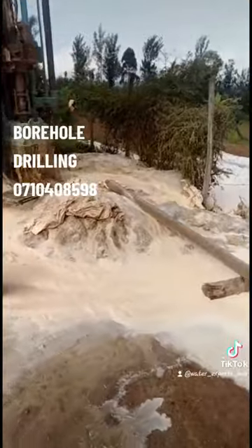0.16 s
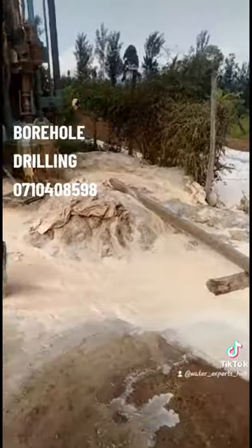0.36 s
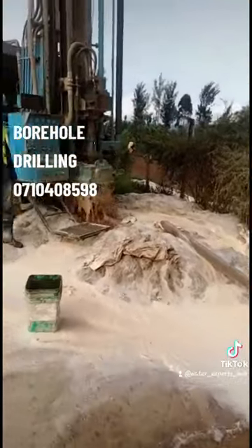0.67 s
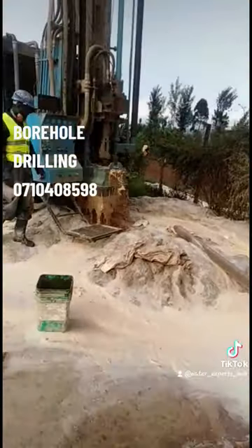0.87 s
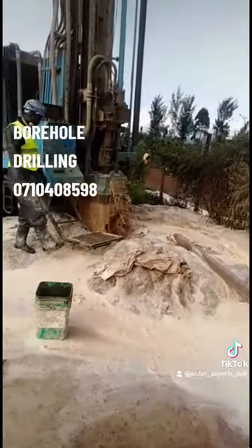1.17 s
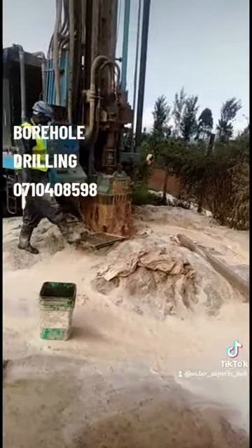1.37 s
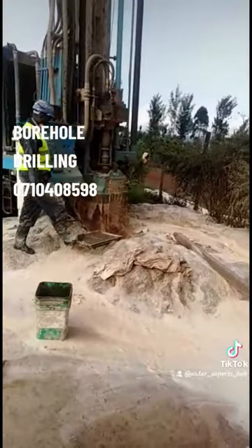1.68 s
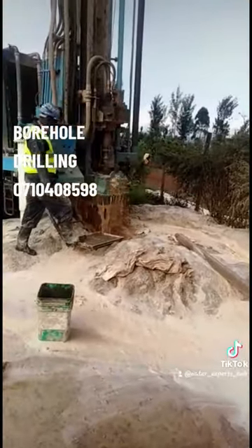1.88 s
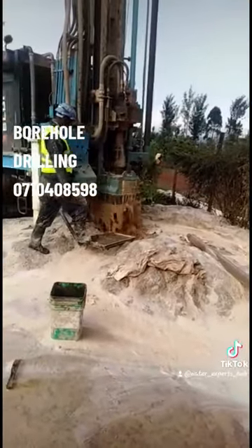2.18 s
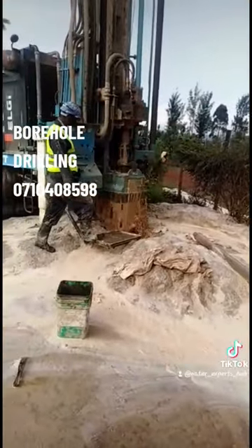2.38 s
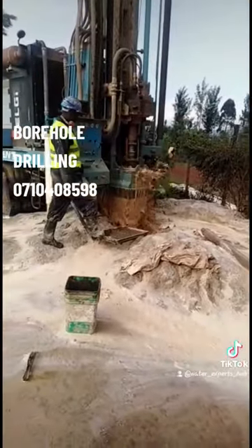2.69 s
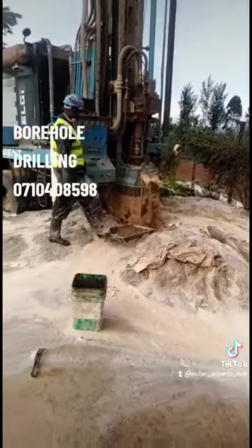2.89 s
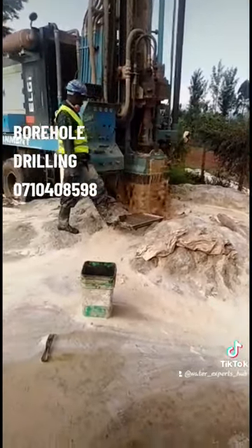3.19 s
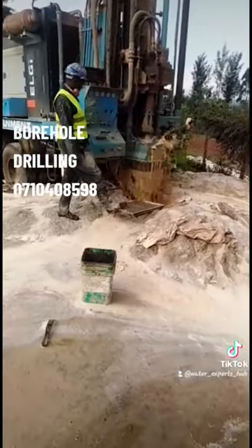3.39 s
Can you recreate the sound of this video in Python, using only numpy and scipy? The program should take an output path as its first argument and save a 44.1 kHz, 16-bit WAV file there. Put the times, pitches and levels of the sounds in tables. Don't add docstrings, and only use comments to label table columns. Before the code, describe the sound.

Deep throbbing diesel drone of a drilling rig, with hissing air, wet splatter and metal knocks

```python
import sys
import numpy as np
from scipy import signal
from scipy.fft import rfft, irfft
from scipy.io import wavfile
from scipy.ndimage import uniform_filter1d

SR = 44100
rng = np.random.default_rng(int(sys.argv[2]) if len(sys.argv) > 2 else 0)


def undo_db(level):
    steps = np.asarray(level, float) / 20
    return 10 ** steps


def file_out(sig):
    cols = np.atleast_2d(sig).T
    lim = np.clip(cols, -1, 1)
    pcm = np.round(lim * 32767).astype(np.int16)
    wavfile.write(sys.argv[1], SR, pcm)


N = 156114

# (time [s], firing rate [Hz], level [dB])
ENGINE_RUN = [(0, 68.92, -12.5), (.2, 67.91, -17.5), (.5, 67.52, -15.5), (1.1, 66.39, -16.5),
              (1.55, 66.32, -16.5), (1.85, 67.88, -15.5), (2.1, 69.7, -16.5), (2.27, 71.3, -14.5),
              (2.4, 72.78, -16), (2.55, 74.24, -13), (2.72, 75.16, -13), (2.85, 75.24, -15.5),
              (2.95, 74.87, -13), (3.15, 74.85, -13.5), (3.35, 72.58, -19.5), (3.44, 71.7, -17.5),
              (3.5, 71.3, -17)]
# (multiple of shaft rate, level [dB])
SHAFT_ORDERS = [(.5, -31), (1, -26.5), (1.5, -30), (2, -25), (2.5, -27), (3, -0.5), (3.5, -21.5), (4, -17),
                (4.5, -22), (5, -26), (6, -21), (7, -35), (7.5, -27.5), (9, -15), (12, -28), (13, -45),
                (14, -36.5), (15, -36.5), (16, -33.5), (17, -37.5)]
# (frequency [Hz], density [dB per Hz])
ROAR_COLOUR = [(15, -23), (50, -1), (90, 3), (200, -8.5), (400, -10), (800, -20), (1500, -32), (4000, -58)]
# (time [s], flow level [dB], left lean [dB])
AIR_FLOW = [(0, 6, -1.5), (.45, -0.5, 10.5), (.5, 3, 4), (.92, 2.5, 6.5), (1.4, 2.5, 1.5),
            (1.95, -1.5, 4.5), (2.25, -1, 6.5), (2.55, 1.5, 5), (2.7, -2.5, 4), (2.9, -5, 0),
            (3.02, 1, 6.5), (3.2, -4.5, 1), (3.3, -0.5, -6), (3.54, 1, 2.5)]
# (frequency [Hz], density [dB per Hz])
BLAST_COLOUR = [(300, -14), (1000, -17), (2200, -4), (2700, 0), (3800, -3.5), (4300, -5.5), (8000, -11.5),
                (14500, -21.5)]
# (frequency [Hz], width [Hz], level [dB])
CASING_MODES = [(1120, 52, 16.5), (1490, 15.3, 11.5), (1703, 130, -0.5), (2165, 170, -11), (2610, 19, -2),
                (3220, 360, -11), (3550, 88, -5), (3935, 130, -12.5), (4930, 92, -5)]
# (peak time [s], length [s], spray level [dB], splosh level [dB])
SLURRY_GUSHES = [(0.125, 0.012, -38.5, -53), (0.181, 0.057, -46, -63), (0.26, 0.014, -68, -65),
                 (0.331, 0.21, -42.5, -40), (0.592, 0.046, -44.5, -36), (0.655, 0.018, -47.5, -38),
                 (0.826, 0.1, -46, -34.5), (0.993, 0.069, -44.5, -33), (1.095, 0.069, -40.5, -40),
                 (1.213, 0.08, -42.5, -39.5), (1.35, 0.14, -44.5, -42), (1.497, 0.11, -49.5, -33),
                 (1.656, 0.092, -43.5, -37.5), (1.746, 0.016, -48, -34), (1.89, 0.2, -46.5, -39.5),
                 (2.134, 0.05, -44, -30.5), (2.196, 0.04, -46, -36.5), (2.323, 0.034, -43.5, -31.5),
                 (2.446, 0.084, -52.5, -36.5), (2.589, 0.061, -61, -42), (2.709, 0.022, -72, -54),
                 (2.767, 0.061, -57, -39.5), (2.842, 0.052, -52.5, -40), (3.089, 0.11, -47.5, -39.5),
                 (3.258, 0.019, -54, -42), (3.312, 0.046, -58, -50), (3.455, 0.026, -55, -55)]
# (frequency [Hz], density [dB per Hz])
SPRAY_COLOUR = [(1200, -11.5), (2000, -6.5), (3000, 3.5), (4000, -0.5), (6000, -5.5), (8000, -7),
                (10000, -11.5), (14500, -16)]
# (frequency [Hz], density [dB per Hz])
SPLOSH_COLOUR = [(120, -31), (250, -12), (450, 3), (700, 3.5), (900, -3), (1300, -7), (2000, -10.5),
                 (3000, -42)]
# (peak time [s], length [s], level [dB])
AIR_SQUIRT = [
    (3.075, 0.043, -46),
]
# (frequency [Hz], density [dB per Hz])
SQUIRT_COLOUR = [(5000, -32), (6500, -12), (7300, 0), (8300, -10), (10500, -29)]
# (time [s], level [dB])
GUARD_TICKS = [(0.183, -29), (0.3154, -18), (0.5511, -29), (0.5811, -27), (0.7667, -32), (0.8809, -32),
               (1.1827, -34), (1.3189, -22.5), (1.5733, -28), (2.0742, -29), (2.0916, -31), (2.3156, -32),
               (2.414, -32), (2.574, -37), (2.9627, -46), (3.2266, -35), (3.2924, -40), (3.3074, -39),
               (3.4466, -31)]
# (time [s], level [dB], pitch [Hz])
PIPE_CLANKS = [(.312, -26, 675), (.33, -58, 2600), (.44, -45, 2650), (.65, -28.5, 1110), (0.789, -41, 1800),
               (0.963, -29, 1120), (1.19, -36, 1120), (1.484, -34, 920), (2.308, -44, 1490),
               (2.446, -32.5, 1660), (3.037, -34.5, 1240), (.6, -28.5, 650), (.875, -35, 1120),
               (.815, -36, 1790), (.46, -37, 2470), (2.78, -39, 1070)]
# (pitch ratio, level [dB], t60 [s])
PIPE_MODES = [(1.002, 1, .055), (1.04, -2.5, .045), (1.325, -6, .04), (1.57, -8, .035)]
# (time [s], level [dB], pitch [Hz])
STRING_KNOCKS = [(0.117, -17, 452), (0.133, -13, 460), (0.19, -26, 465), (0.246, -30, 476),
                 (0.297, -13, 546), (0.313, -19, 560), (0.534, -13, 614), (0.567, -13, 445),
                 (0.651, -36, 487), (0.71, -11.5, 617), (0.773, -22, 640), (0.846, -15.5, 576),
                 (0.937, -10, 520), (0.968, -17, 527), (0.985, -52, 482), (1.033, -28, 560),
                 (1.254, -17, 570), (1.321, -41, 503), (1.369, -39, 574), (1.415, -24, 506),
                 (1.467, -35, 493), (1.495, -25.5, 567), (1.528, -33, 576), (1.64, -27, 455),
                 (1.733, -21, 473), (2.111, -30, 464), (2.301, -26, 544), (2.596, -32, 580),
                 (2.767, -26, 474), (3.036, -27, 700)]
# (pitch ratio, level [dB], t60 [s])
STRING_MODES = [(1.0, -9, .035), (1.21, -10, .03), (.62, -10, .04), (1.5, -13, .025)]
# (time [s], level [dB], pitch [Hz])
SLUG_THUMPS = [(2.295, -28, 140), (2.305, -30.5, 225), (2.365, -23.5, 142), (2.425, -26.5, 149),
               (2.43, -30, 326), (2.505, -26, 160), (2.8, -26, 162), (2.87, -25.5, 159), (2.92, -23, 152),
               (2.955, -25, 176), (3.01, -25, 154), (3.125, -23.5, 173.6), (3.23, -26.5, 147),
               (3.41, -21.5, 153), (.36, -17, 165)]
# (pitch ratio, level [dB], t60 [s])
SLUG_MODES = [(1.0, 2.5, 0.21), (1.2, -9.5, .12)]
# (frequency [Hz], left-right coherence)
PORT_LIKENESS = [(60, 0.99), (150, 0.86), (300, 0.87), (600, 0.77), (1200, 0.29), (2500, 0.27), (5000, 0.5),
                 (10000, 0.15)]
# (frequency [Hz], left minus right [dB])
PORT_LEAN = [(60, 3.5), (180, 4.5), (530, 4), (1580, 1.5), (4690, 3), (14000, 5)]
# (frequency [Hz], threshold [dB])
GATE_THRESHOLD = [(300, -30), (1200, -10), (2800, -13), (5000, -9), (7500, -6), (9500, -2), (12000, -1),
                  (14000, 2)]

PORT_LAG_S = 13.5 / 44100
RISE_S = .0025
RATTLE_DEPTH = .17


def evened(x):
    return x / np.sqrt(np.mean(x ** 2) + 1e-20)


def read(points, hz):
    f, value = np.transpose(points)
    return np.interp(np.log(hz + 1), np.log(f + 1), value)


def curve(table, column):
    rows = np.array(table, float)
    return np.interp(np.arange(N) / SR, rows[:, 0], rows[:, column])


def drift(seconds):
    size = max(round(seconds * SR), 2)
    once = uniform_filter1d(rng.standard_normal(N), size, mode="wrap")
    return evened(uniform_filter1d(once, size, mode="wrap"))


def ports(x, other):
    hz = np.fft.rfftfreq(N, 1 / SR)
    same = np.clip(read(PORT_LIKENESS, hz), 0, 1)
    lean = undo_db(read(PORT_LEAN, hz) / 2)
    a, b = rfft(x), rfft(other)
    left = a * lean * np.exp(-2j * np.pi * hz * PORT_LAG_S)
    right = (same * a + np.sqrt(1 - same ** 2) * b) / lean
    return irfft(np.array([left, right]), N)


def patches(frames, time_size, band_size=1):
    x = uniform_filter1d(rng.standard_normal((frames, 257)), size=time_size, axis=0)
    return evened(uniform_filter1d(x, size=band_size, axis=1)).T


def rush(colour, patchy_db, flicker_db, grain=1., ring=0):
    frames, band_hz = N // 128 + 5, np.fft.rfftfreq(512, 1 / SR)
    streak_db = 1.07 * patches(frames, 12) * np.clip(band_hz / 5000, 0, 1.5)[:, None]
    flicker = evened(uniform_filter1d(rng.standard_normal(frames), size=5))
    gain_db = streak_db + patchy_db * patches(frames, 14, 6) + flicker_db * flicker
    z = signal.stft(grain * rng.standard_normal((2, N)), nperseg=512, noverlap=384)[2]
    z = z * undo_db(gain_db)[:, :z.shape[2]]
    x = signal.istft(z, nperseg=512, noverlap=384)[1][:, :N]
    hz = np.fft.rfftfreq(N, 1 / SR)
    modes = sum(undo_db(10.5 + db) / (1 + (2 * (hz - p) / width) ** 2) for p, width, db in CASING_MODES)
    x = irfft(rfft(x) * undo_db(read(colour, hz)) * (1 + ring * modes), N)
    return evened(ports(x[0], x[1]))


def ticks():
    level_db, t60_s = -12.5, .064
    t, out = np.arange(SR // 10) / SR, np.zeros(N + SR)
    for s, db in GUARD_TICKS:
        strike = undo_db(db + level_db - 60 * t / t60_s) * np.minimum(t / RISE_S, 1)
        out[round(s * SR):][:len(t)] += strike
    return out[:N]


def strikes(blows, modes):
    t, out = np.arange(SR // 5) / SR, np.zeros(N + SR)
    for s, db, pitch_hz in blows:
        ring = sum(undo_db(d - 60 * t / t60) * np.sin(2 * np.pi * pitch_hz * k * t) for k, d, t60 in modes)
        out[round(s * SR):][:len(t)] += undo_db(db) * np.minimum(t / RISE_S, 1) * ring
    return ports(out[:N], np.roll(out[:N], 90))


def gushes(table, column):
    shortest_s = .035
    t, power = np.arange(N) / SR, np.zeros(N)
    for row in table:
        swell = np.exp(-4 * ((t - row[0]) / max(row[1], shortest_s)) ** 2)
        power += undo_db(row[column]) ** 2 * swell
    return np.sqrt(power)


def droplets():
    drops_per_s, spread_db = 600, -3
    falls = rng.random(N) < drops_per_s / SR
    drops = undo_db(spread_db * np.minimum(rng.exponential(1, N), 2)) * falls
    return 1 + uniform_filter1d(drops, size=60) * 20


def splosh(grain):
    level = undo_db(-1.5) * gushes(SLURRY_GUSHES, 3)
    return level * rush(SPLOSH_COLOUR, patchy_db=2.5, flicker_db=-.33, grain=grain)


def spray(grain, fire):
    level = np.hypot(undo_db(3.5) * gushes(SLURRY_GUSHES, 2), ticks()) * (1 + RATTLE_DEPTH * fire)
    wet = level * rush(SPRAY_COLOUR, patchy_db=2.5, flicker_db=2., grain=grain)
    return wet + gushes(AIR_SQUIRT, 2) * rush(SQUIRT_COLOUR, patchy_db=1.5, flicker_db=.4)


def blast(flow_db, fire):
    pulse = 1 + RATTLE_DEPTH * (fire + fire ** 2 - .5)
    return undo_db(-43.5 + flow_db) * pulse * rush(BLAST_COLOUR, patchy_db=1.5, flicker_db=1.92, ring=1)


def roar(flow_db, fire):
    level = undo_db(-28 + .76 * flow_db) * (1 + .1 * fire)
    return level * rush(ROAR_COLOUR, patchy_db=1.37, flicker_db=.34)


def engine(turns):
    pipe_order, pipe_hz, pipe_width_hz = 9, 200, 12
    waver_s, waver_turns, firing_start_turns = .1, .035, .53
    loaded_hz, unload_db_per_hz = 67.5, 1.2
    out, firing_hz = np.zeros(N), curve(ENGINE_RUN, 1)
    shaft_hz = firing_hz / 3
    unload_db = -unload_db_per_hz * np.maximum(firing_hz - loaded_hz, 0)
    for k, db in SHAFT_ORDERS:
        gain, waver_db = undo_db(unload_db * (k > 3)), 2.
        if k == pipe_order:
            gain = 1 / (1 + (2 * (k * shaft_hz - pipe_hz) / pipe_width_hz) ** 2) ** .7
            waver_db = 1.5
        elif k == 3:
            waver_db = .5
        start = firing_start_turns
        if k % 3:
            start = rng.random() + waver_turns * drift(waver_s)
        level = gain * undo_db(db + waver_db * drift(waver_s))
        out += level * np.cos(2 * np.pi * (k * turns + start))
    return np.sqrt(2) * undo_db(curve(ENGINE_RUN, 2)) * ports(out, out)


def scene():
    turns = np.cumsum(curve(ENGINE_RUN, 1)) / SR / 3
    fire = np.cos(2 * np.pi * (3 * turns + .29))
    flow_db, grain = curve(AIR_FLOW, 1), droplets()
    lean = undo_db(curve(AIR_FLOW, 2) * np.array([[.5], [-.5]]))
    hole = splosh(grain) + spray(grain, fire) + blast(flow_db, fire)
    pipe = strikes(PIPE_CLANKS, PIPE_MODES) + strikes(STRING_KNOCKS, STRING_MODES)
    low = strikes(SLUG_THUMPS, SLUG_MODES) + roar(flow_db, fire) + engine(turns)
    return lean * (hole + pipe) + lean ** .22 * low


def gate(x):
    jitter_db, follows, pad = 3.5, .85, 336
    window = np.sin(np.pi * (np.arange(2048) + .5) / 2048)
    padded = np.pad(x, ((0, 0), (pad, 0)), "reflect")
    hz, _, z = signal.stft(padded, SR, window, nperseg=2048, noverlap=1024)
    power = abs(z) ** 2
    band_db = 10 * np.log10(uniform_filter1d(power, size=41, axis=1) + 1e-20)
    usual_db = np.median(band_db, axis=2, keepdims=True)
    wander = np.repeat(rng.standard_normal((z.shape[2], 65)), 16, axis=1)[:, :len(hz)].T
    limit_db = usual_db + follows * (band_db - usual_db)
    limit_db = limit_db + read(GATE_THRESHOLD, hz)[:, None] + jitter_db * wander
    kept = uniform_filter1d(power, size=2, axis=1) > undo_db(limit_db) ** 2
    return signal.istft(z * kept, SR, window, nperseg=2048, noverlap=1024)[1][:, pad:pad + N]


def top_cut(x):
    return signal.sosfilt(signal.butter(12, 14290, fs=SR, output="sos"), x)


def record(dry):
    mix = gate(dry) + .002
    return top_cut(mix)


dry = scene()
out = record(dry)
file_out(out)
```